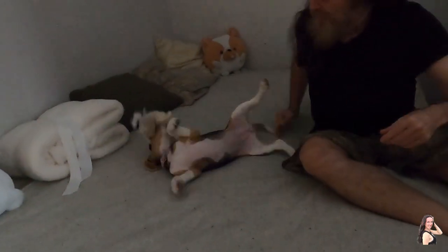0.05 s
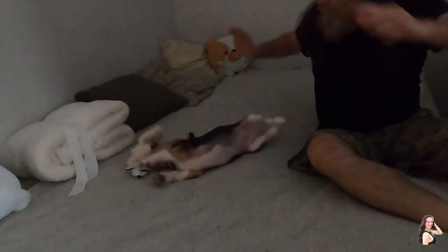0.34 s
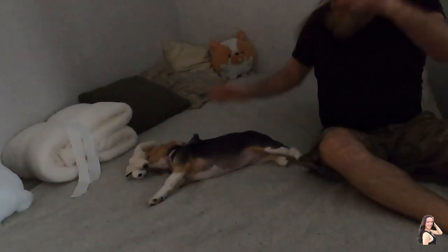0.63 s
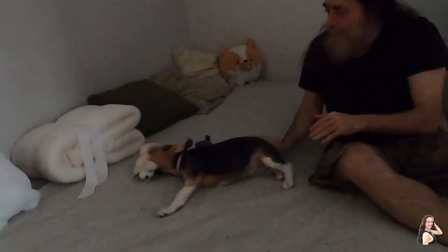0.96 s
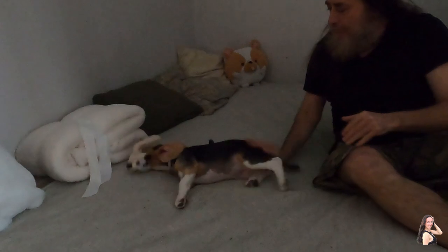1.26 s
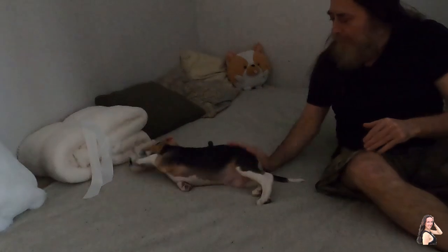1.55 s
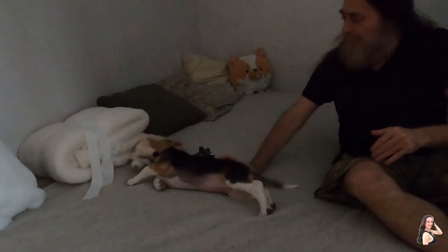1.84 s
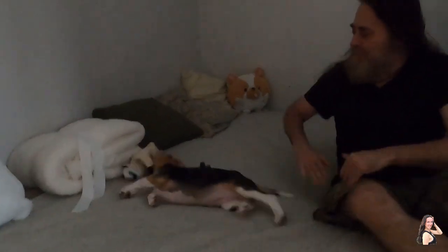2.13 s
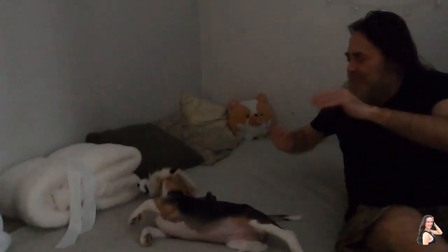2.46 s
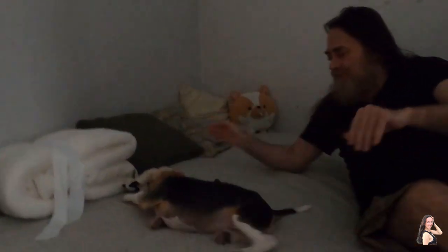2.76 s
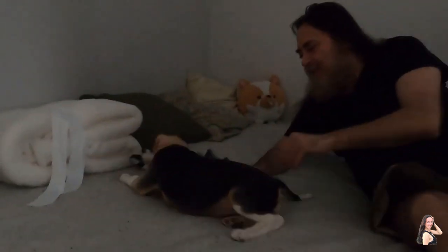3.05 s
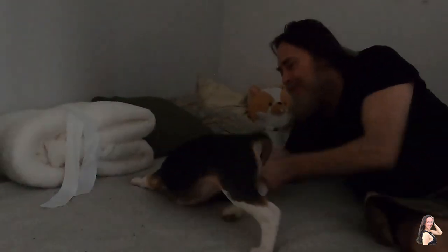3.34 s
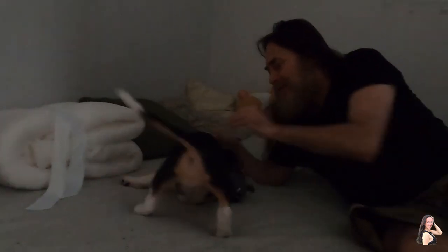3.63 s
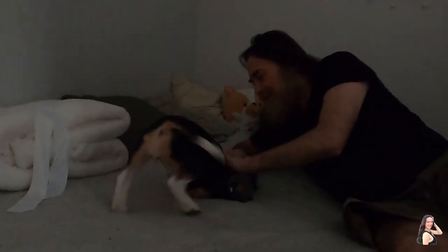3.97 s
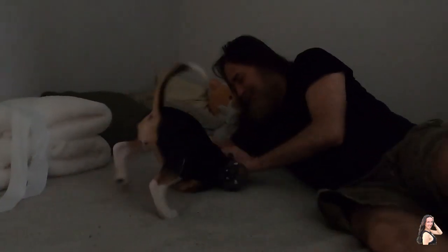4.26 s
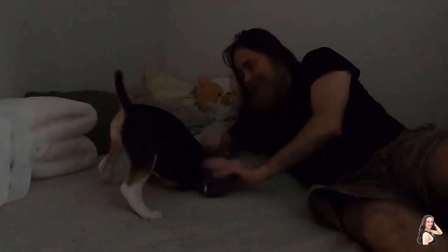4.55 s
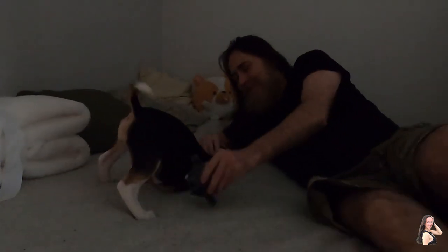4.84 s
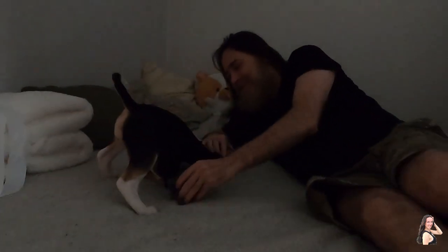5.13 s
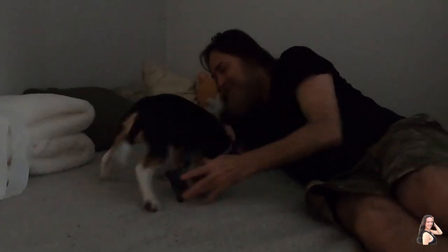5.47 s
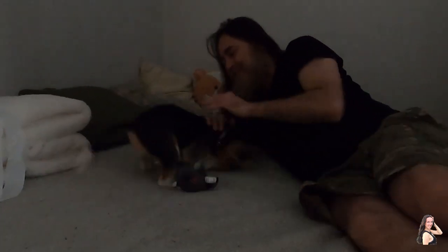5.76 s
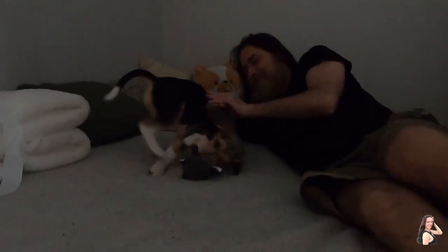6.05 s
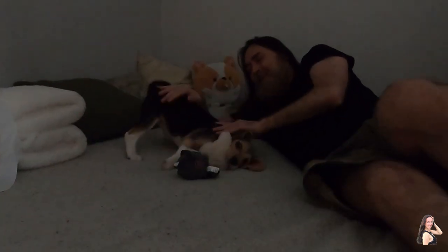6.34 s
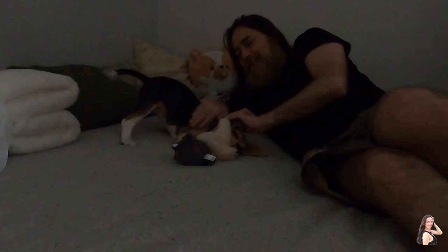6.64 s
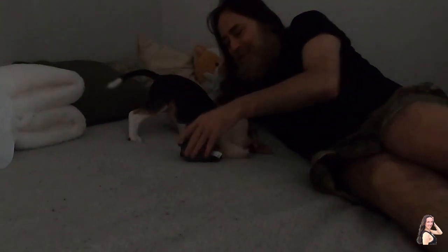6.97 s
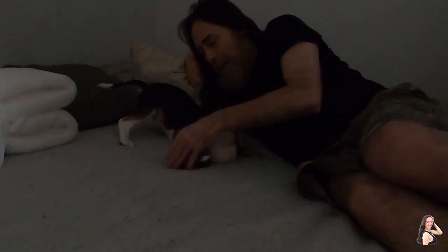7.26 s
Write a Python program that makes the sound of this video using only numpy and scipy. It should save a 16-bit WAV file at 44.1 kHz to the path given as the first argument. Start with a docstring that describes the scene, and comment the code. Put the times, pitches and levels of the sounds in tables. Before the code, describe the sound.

Short, reedy squeaks from a squeezed toy come several times a second, shifting in pitch, the hardest ending in a hollow pop. They thin out to scattered squeaks and pops in the middle, then return in a slower run. Underneath are quiet sliding cloth and the dull bumps of a puppy moving on a mattress. Heard from nearby in a small room, each squeak rings briefly off the walls while the bed sounds stay dry.

```python
"""Puppy and squeaky toy on a bed

A small bare room, heard through two closely spaced microphones. A puppy plays on the bed while
a toy is squeezed in quick runs: each squeeze blows a reed for a few hundredths of a second, and
hard ones end in a hollow pop. Paws and limbs thump the mattress, the bedding rustles, and near
walls answer every squeak."""
import sys
import numpy as np
from scipy import signal
from scipy.fft import rfft, irfft
from scipy.io import wavfile
from scipy.ndimage import uniform_filter1d

SR = 44100
rng = np.random.default_rng(int(sys.argv[2]) if len(sys.argv) > 2 else 0)


def output_pcm(signal):
    """Save a mono or channel-first signal as 16-bit PCM at the path in sys.argv[1].

    Samples are clipped to [-1, 1] before scaling.
    """
    pcm = np.clip(np.atleast_2d(signal).T, -1, 1) * 32767
    wavfile.write(sys.argv[1], SR, np.round(pcm).astype(np.int16))


N = 330750
TIME = np.arange(N) / SR
TOP_HZ = 15300  # upper limit of the microphones
SIDES = np.array([[1], [-1]])  # adds on the left, subtracts on the right

# spectrum of sliding cloth: (frequency [Hz], level [dB])
CLOTH_SPECTRUM = [(350, -9.5), (700, -8.5), (1300, 2.5), (2500, -4.5), (4000, -6.5), (7500, -15),
                  (10000, -26.5), (13000, -33.5), (15000, -48)]
# spectrum of air tearing through the stalling reed: (frequency [Hz], level [dB])
AIR_SPECTRUM = [(60, -45), (200, -8.5), (500, -20.5), (800, -15.5), (1300, 10.5), (2500, 4.5), (3600, -2.5),
                (7500, -9.5), (9500, -31.5), (15000, -59)]


def undb(db):
    """Decibels to gain."""
    return 10 ** (np.asarray(db) / 20)


def along(points, hz):
    """Read (frequency [Hz], value) points on a log-frequency axis."""
    f, value = np.transpose(points)
    return np.interp(np.log(np.maximum(hz, 1)), np.log(f), value)


def noise(spectrum, size=N):
    """Noise of rms 1 with the given spectrum."""
    gain = undb(along(spectrum, np.fft.rfftfreq(size, 1 / SR)))
    x = irfft(rfft(rng.standard_normal(size)) * gain, size)
    return x / x.std()


def wander(rate_hz, size):
    """Smooth random motion with a spread near 1."""
    hold = max(int(SR / rate_hz), 1)
    stairs = np.repeat(rng.standard_normal(size // hold + 1), hold)
    return 1.375 * uniform_filter1d(uniform_filter1d(stairs, hold), hold)[:size]


def add(track, s, sound):
    """Mix a sound into a track at time s."""
    start = max(int(s * SR), 0)
    part = sound[..., :N - start]
    track[..., start:start + part.shape[-1]] += part


def pan(x, left_db):
    """Place a sound between the microphones, left_db louder on the left."""
    return x * undb(SIDES * left_db / 2)


def bedding(hiss_boost_db=6, rub_boost_db=1, grain_db=1.5):
    """Cloth slides in small catches: a wide, grainy hiss above a dull rubbing near the centre."""
    # stirring on the bed: (time [s], hiss level [dB], rubbing level [dB])
    stirring = [(0, -68, -65.5), (1.1, -63.5, -57), (1.85, -66, -64.5), (2.098, -69, -59.5),
                (2.4, -61, -60.5), (2.898, -60, -59), (3.198, -63.5, -56), (3.75, -70, -64),
                (4.099, -65, -55.5), (4.35, -75, -64.5), (4.7, -69, -64.5), (5.25, -77.5, -69.5),
                (5.551, -67.5, -70), (5.75, -71.5, -62), (6.301, -71, -64), (6.9, -70, -68),
                (7.349, -73.5, -67), (7.5, -62.5, -56)]
    # spectrum of the rubbing: (frequency [Hz], level [dB])
    rub_spectrum = [(25, 3.5), (60, -7), (110, -6.5), (170, 4.5), (300, 1.5), (500, -9.5), (900, -17.5),
                    (2000, -61)]
    times, *levels = np.transpose(stirring)
    hiss_db, rub_db = (np.interp(TIME, times, level) for level in levels)
    surge_db = 2.2 * wander(22, N)
    hiss = noise(CLOTH_SPECTRUM) + 0.83 * SIDES * noise(CLOTH_SPECTRUM)
    hiss *= undb(hiss_db + hiss_boost_db + surge_db / 2 + grain_db * wander(500, N))
    rub = noise(rub_spectrum) + 0.26 * SIDES * noise(rub_spectrum)
    return hiss + rub * undb(rub_db + rub_boost_db + surge_db)


def shell_pops(contact_s=0.0012, glide_s=0.0019, crunch_decay_s=0.01, rebound_s=0.0105):
    """The toy's soft shell snaps back with a falling ring and a crunch of air, then rebounds once."""
    # hollow pops: (time [s], level [dB], pitch [Hz], decay [s], low body [dB], rebound [dB])
    snaps = [(0.0339, -33.5, 1650, 0.00058, -20, -16), (0.9113, -16, 1059, 0.0022, 4, -18),
             (1.034, -23, 967, 0.0057, -17, -7.5), (1.16, -16, 1186, 0.0024, 6, -11),
             (1.302, -22.5, 1052, 0.0021, -2, -7), (1.413, -19, 1293, 0.0015, -17, -2),
             (1.576, -16.5, 1108, 0.0018, -8, -25), (3.895, -18, 1184, .0012, 4, -20),
             (4.0861, -24.5, 990, 0.00071, 11, -7.5), (4.8982, -22, 1056, 0.0024, 9, -8.5),
             (5.029, -22, 965, 0.0012, 11.5, -9)]
    # modes of the shell: (pitch [multiple], decay time [multiple], level [dB])
    modes = [(0.261, 2.2, -16.5), (0.386, 1.8, -15), (.68, 1.2, -9), (1.001, 1, 8), (1.85, .85, -2),
             (3.1, .6, -25), (5.599, .35, -28)]
    out, t = np.zeros(N), np.arange(SR // 20) / SR
    rise = 1 - np.exp(-(t / contact_s) ** 2)
    for s, db, hz, decay_s, body_db, rebound_db in snaps:
        chirp = 106 * decay_s * np.exp(-t / glide_s)  # a longer ring starts further above its pitch
        phase = 2 * np.pi * np.cumsum(hz * (1 + chirp)) / SR
        ring = 0
        for ratio, longer, mode_db in modes:
            # a full snap also shakes the body below the main ring; a light one only chirps
            gain = undb(mode_db + body_db * (ratio < 1))
            ring += gain * rise * np.exp(-t / (decay_s * longer)) * np.sin(ratio * phase)
        ring /= abs(ring).max()
        for delay_s, blow_db, crunch_db in (0, 0, -21), (rebound_s, rebound_db, -10):
            crunch = undb(crunch_db) * rise * noise(AIR_SPECTRUM, len(t)) * np.exp(-t / crunch_decay_s)
            add(out, s + delay_s, undb(db + blow_db) * (ring + crunch))
    return out


def reed_squeak(length_s, attack_s, pitches, octave_db, upper_db, shrill_db, chatter,
                sag_per_s=1.97, swell_db=0.45, colour_db=2.5, flutter_db=2.5, rattle_db=4.5,
                air_db=-29, burst_db=-3.5, burst_lag_s=0.0023, burst_width_s=0.0069):
    """One puff through the reed: the pitch arches and sags; a hard puff bends further and chatters."""
    # colour of the reed's upper partials: (frequency [Hz], level [dB])
    reed_spectrum = [(2800, 6.5), (3600, 1.5), (4700, 0.5), (5900, -4), (7000, -4), (8200, -6.5),
                     (9200, -16.5), (10500, -27), (12500, -33), (15000, -39)]
    # how much of the shrill top a partial takes: (frequency [Hz], weight [factor])
    shrill_weights = [(5500, 0.086), (7800, 1.03), (9500, 1.07), (15000, 1)]
    t = np.arange(int(0.12 * SR)) / SR
    progress = np.clip(t / length_s, 0, 1)
    release = 0.42 * (1 + chatter)  # share of the length over which the reed stalls
    stall = np.clip((t / length_s - 1) / release + 0.5, 0, 1)
    arch = np.polyval(np.polyfit([0.1, 0.5, 0.9], pitches, 2), progress)
    sag = (sag_per_s * length_s + 0.2726 * chatter) * stall
    jitter = 0.0054 + 0.024 * chatter ** 2 + 0.052 * chatter * np.sqrt(stall)
    hz = arch * (1 - sag + jitter * wander(900, len(t)))
    phase = 2 * np.pi * np.cumsum(hz) / SR
    opening = np.clip(t / attack_s, 0, 1)
    pressure = opening * np.cos(stall * np.pi / 2) ** 2 * undb(swell_db * (2 * progress + 1))
    overtones = 0
    for k in range(2, int(TOP_HZ / pitches[1]) + 1):
        top_db = along(reed_spectrum, k * hz) + shrill_db * along(shrill_weights, k * hz)
        db = octave_db if k == 2 else upper_db + top_db
        # the nozzle delays the higher partials, and every grip colours them a little differently
        lag = (k - 1) * np.pi / 2 + 0.29 * (k - 1) ** 2
        grip_db = colour_db * rng.standard_normal()
        overtones += undb(db + grip_db + flutter_db * wander(179, len(t))) * np.sin(k * phase - lag)
    # the reed slaps shut less evenly as a hard puff goes on
    slap = np.sqrt(opening) * undb(rattle_db * chatter * progress * (wander(1300, len(t)) + stall))
    air = noise(AIR_SPECTRUM, len(t)) * (1 + np.cos(phase) / 2)
    burst = chatter ** 2 * np.exp(-((t - length_s - burst_lag_s) / burst_width_s) ** 2)
    burst *= undb(2.7 * wander(700, len(t)))
    bright_gain = np.hypot(1, undb(upper_db - 2))  # brighter squeaks hiss more
    hiss = air * bright_gain * (undb(air_db) * pressure + undb(burst_db) * burst)
    return pressure * (np.sin(phase) + slap * overtones) + hiss


def toy_squeezes(usual_hz=1160, usual_attack_s=0.0029, attack_halving_hz=224):
    """Runs of squeezes just left of centre; a harder one sounds higher and speaks sooner."""
    # puffs through the reed: (time [s], length [s], start pitch [Hz], middle pitch [Hz], level [dB],
    # octave [dB], upper partials [dB], shrill top [dB], chatter [0-1])
    squeezes = [(0.053, 0.022, 1170, 1176, -27.5, 1, -2.5, 0.5, 0.29),
                (0.237, .027, 955, 958.5, -38.5, 3, -9, 4.5, 0),
                (0.327, 0.023, 1369, 1327, -24, -9, -5.5, -4, 0.42),
                (0.514, 0.032, 1020, 1053, -30.5, -4, -21, -3.5, 0.33),
                (0.621, 0.02, 1356, 1366, -23.5, -11, -13.5, -7, 0.51),
                (0.756, .028, 982, 983, -31, -7, -22, -6, 0.04),
                (.892, 0.024, 1225, 1278, -24, -16, -16, -6, 0.77),
                (1.137, 0.026, 1300, 1342, -21, -10.5, -19.5, 6.5, 0.79),
                (1.401, 0.01786, 1202, 1207, -26, -9, -18, 7.5, 1),
                (1.543, 0.033, 989, 996.5, -29, -6, -20, 4, 0.33),
                (1.689, .017, 1160, 1165, -28, -8.5, -20.5, 4.5, 0.21),
                (1.914, 0.032, 985, 1026, -32, 1, -19.5, 4.5, .2),
                (2.086, 0.02, 1159, 1137, -32, -12, -14, -10, 0.35),
                (2.209, .024, 1031, 996, -36, -6, -20, -3, 0.13),
                (2.384, 0.021, 1110, 1179, -29.5, -8, -7.5, -1, 0.37),
                (2.458, 0.028, 1092, 1089, -29.5, -6, -11.5, -1.5, 0.44),
                (2.589, 0.022, 1307, 1445, -23, -3, -10.5, 3, 0.52),
                (2.751, 0.025, 962, 954, -35.5, -1, -17, -12, 0.06),
                (3.323, .023, 1241, 1177, -33, -2, -3, -4.5, .68),
                (3.547, .023, 1193, 1184, -24.5, -11, -16, -3, 0.18),
                (3.732, 0.0181, 1052, 1100, -27, -5, -23, 3.5, 0.21),
                (3.87, .023, 1143, 1135, -27, -19, -18.5, -6, 0.55),
                (4.348, .042, 1107, 961.7, -61, -14, -27, -2, 0.3),
                (5.295, 0.029, 1096, 1085, -33.5, -9.5, -13, 15, 0.12),
                (5.418, .067, 1461, 1503, -31, -9, -15, 17.5, 0.15),
                (6.041, 0.0069, 1086, 1050, -34, -4, -8, -7.5, 0.23),
                (6.119, 0.043, 1014, 943.7, -31, -11.5, -19, -1, 0),
                (6.276, 0.016, 1083, 1098, -30.5, -4, -7.5, -1.5, 0.28),
                (6.626, 0.031, 1162, 1191, -30, 1.7, -2, 0.5, 0.33),
                (6.977, 0.025, 1164, 1171, -28, 0, -6, 4.5, 0.28),
                (7.295, 0.028, 1253, 1323, -23.5, -3, -6.5, -2, 0.39)]
    out = np.zeros(N)
    for s, length_s, start_hz, middle_hz, db, octave_db, upper_db, shrill_db, chatter in squeezes:
        attack_s = usual_attack_s * 0.5 ** ((middle_hz - usual_hz) / attack_halving_hz)
        overblow = 0.332 * chatter ** 6  # a fully choked reed is forced upwards
        pitches = [start_hz, middle_hz, middle_hz * (0.98 + overblow)]
        squeak = reed_squeak(length_s, attack_s, pitches, octave_db, upper_db, shrill_db, chatter)
        add(out, s, undb(db) * squeak)
    return pan(out, left_db=1)


def paw_steps(hz, per_s=2, db=-56.5, spread_octaves=0.25):
    """Light steps at random, as rows of (time [s], level [dB], pitch [Hz])."""
    seconds = N / SR
    chance = rng.random((int(per_s * seconds), 2))
    return [(when * seconds, db, hz * 2 ** (spread_octaves * (2 * pitch - 1))) for when, pitch in chance]


def mattress_thumps(paw_hz=163.5, paw_decay_s=0.026, push_s=0.0053, wobble=0.13, padding_db=-9):
    """Soft, damped thuds whose pitch wanders as the weight shifts; the padding crumples under each."""
    # thumps, paws high and body weight low: (time [s], level [dB], pitch [Hz])
    thumps = [(0.196, -49.5, 253), (0.308, -54, 40), (1.083, -40, 152), (1.973, -36, 159.2),
              (2.107, -33, 149), (2.351, -47.5, 140.6), (2.918, -41.5, 189), (3.07, -39, 241),
              (3.168, -47.5, 46.2), (3.469, -49, 171), (3.771, -51, 62), (4.086, -52, 207.5),
              (4.16, -53, 42), (4.39, -43.5, 47.6), (5.337, -51.5, 214.1), (5.75, -29, 82.8),
              (5.813, -29, 72.06), (5.856, -38, 47.52), (6.259, -44, 93.3), (6.359, -38.5, 40.01),
              (7.437, -43, 193.8)]
    out, t = np.zeros(N), np.arange(SR // 2) / SR
    for s, db, hz in thumps + paw_steps(paw_hz):
        decay_s = paw_decay_s * (paw_hz / hz) ** 0.82  # deeper thumps last longer
        phase = 2 * np.pi * np.cumsum(hz * (1 + wobble * wander(hz / 2, len(t)))) / SR
        padding = noise([(hz / 2, -14), (hz, 0), (2 * hz, -10), (4 * hz, -32), (20 * hz, -70)], len(t))
        shape = (1 - np.exp(-(t / push_s) ** 2)) * np.exp(-t / decay_s)
        envelope = undb(db + wander(70, len(t))) * shape / shape.max()
        add(out, s, envelope * (np.sin(phase) + undb(padding_db) * padding))
    return out


def sheet_scuffs(grain_db=2.5):
    """A paw or hand drags over the sheet."""
    # strokes on the cloth: (time [s], level [dB], half length [s])
    strokes = [(2.676, -53, 0.18), (3.081, -64, .015), (4.036, -56, 0.0029), (4.544, -63, .04),
               (4.697, -58, 0.0034), (6.21, -60, .04), (6.842, -54.5, 0.0021)]
    envelope = sum(undb(db) * np.exp(-((TIME - s) / half_s) ** 2) for s, db, half_s in strokes)
    return envelope * noise(CLOTH_SPECTRUM) * undb(grain_db * wander(600, N))


def bare_room(x, build_s=0.0092):
    """The direct sound reaches the microphones, then hard echoes off near walls and a short ring."""
    # first echoes: (delay [s], extra delay on the right [s], gain [factor])
    walls = [(.0021, .00007, 0.13), (.0039, 0.039, 0.084), (.0056, 0.008, 0.36), (.0089, 0.0044, 0.33),
             (0.0123, -0.0081, 0.41), (0.0125, -0.0073, 0.22), (0.023, -0.0016, 0.072),
             (.0345, 0.013, 0.14)]
    # length of the diffuse ring: (frequency [Hz], time to fall 60 dB [s])
    ring_t60 = [(200, 0.29), (1200, 0.39), (2500, 0.42), (6000, 0.25), (14000, 0.28)]
    # strength of that ring: (frequency [Hz], level [dB])
    ring_levels = [(200, -5.5), (1200, -3.5), (2500, -3), (6000, -1.5), (14000, -13.5)]
    t = np.arange(int(0.6 * SR)) / SR
    hz = np.fft.rfftfreq(len(t), 1 / SR)
    rise = 1 - np.exp(-(t / build_s) ** 2)
    response = np.zeros((2, len(t)))
    for centre_hz in 125 * 2 ** np.arange(8):
        octaves_off = abs(np.log2(np.maximum(hz, 1) / centre_hz))
        band = np.sqrt(np.clip(1 - octaves_off, 0, 1))
        shape = rise * np.exp(-np.log(1000) * t / along(ring_t60, centre_hz))
        mid, side = irfft(rfft(rng.standard_normal((2, len(t)))) * band, len(t))
        alike = np.exp(-0.36 * (centre_hz / 1700) ** 2)  # both microphones hear long waves alike
        pair = np.sqrt((1 + alike) / 2) * mid + np.sqrt((1 - alike) / 2) * side * SIDES
        response += undb(along(ring_levels, centre_hz)) * pair * shape / np.linalg.norm(shape)
    # the direct sound arrives a shade later and duller on the left
    response[0, 1:3] += [0.45, 0.65]
    response[1, 0] += 1
    for delay_s, lag_s, gain in walls:
        response[0, int(delay_s * SR)] += gain
        response[1, int((delay_s + lag_s) * SR)] += gain
    return signal.fftconvolve(x, response, axes=1)[:, :N]


def close_pair(x):
    """The microphones sit close together, so the image narrows, most of all in the bass."""
    # stereo width: (frequency [Hz], side gain [dB])
    width = [(300, -7.5), (600, -7), (1200, -2.5), (3000, -.5), (8000, -1.5)]
    mid, side = (x[0] + x[1]) / 2, (x[0] - x[1]) / 2
    side_gain = undb(along(width, np.fft.rfftfreq(N, 1 / SR)))
    return mid + SIDES * irfft(rfft(side) * side_gain, N)


def scene():
    """Squeaks, pops and scuffs ring in the room; the bed is heard dry, just left of centre."""
    in_room = bare_room(toy_squeezes() + shell_pops() + sheet_scuffs())
    bed = bedding() + mattress_thumps()
    return close_pair(in_room) + pan(bed, left_db=0.94)


def record(dry, low_cut_hz=28):
    """The microphones drop the deepest rumble and cut the top."""
    low_cut = signal.butter(2, low_cut_hz, "high", fs=SR, output="sos")
    high_cut = signal.ellip(8, 0.2, 70, TOP_HZ, fs=SR, output="sos")
    return signal.sosfilt(high_cut, signal.sosfilt(low_cut, dry))


dry = scene()
out = record(dry)
output_pcm(out)
```